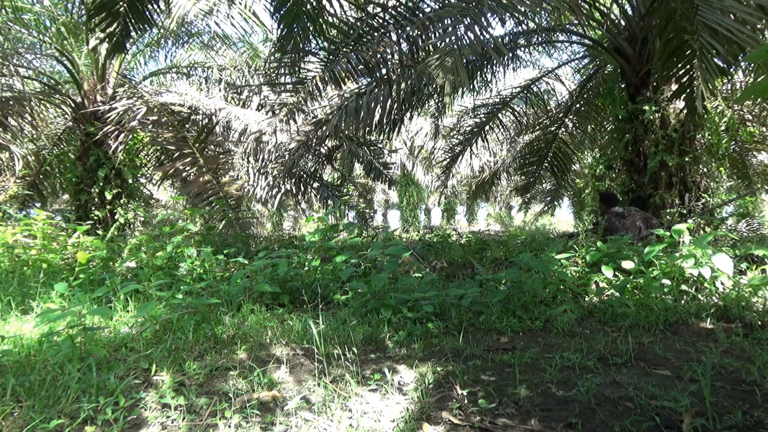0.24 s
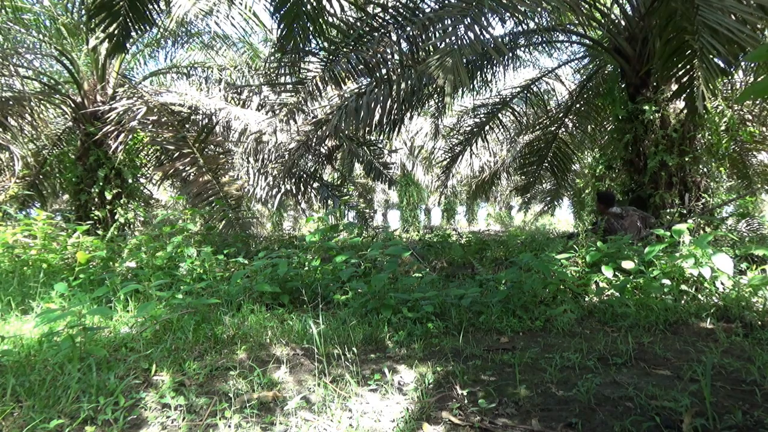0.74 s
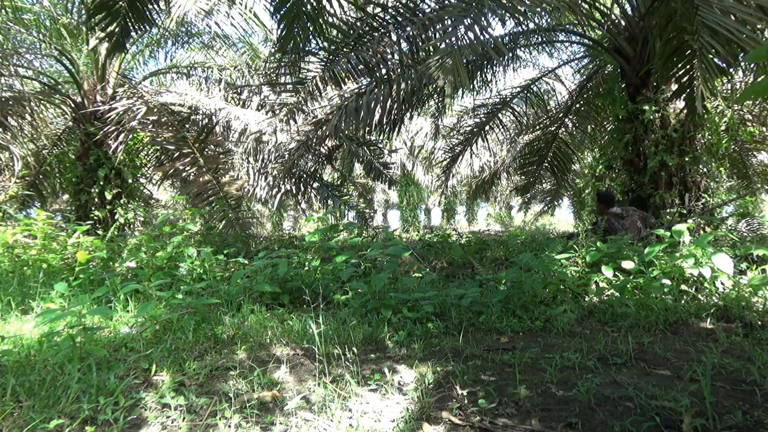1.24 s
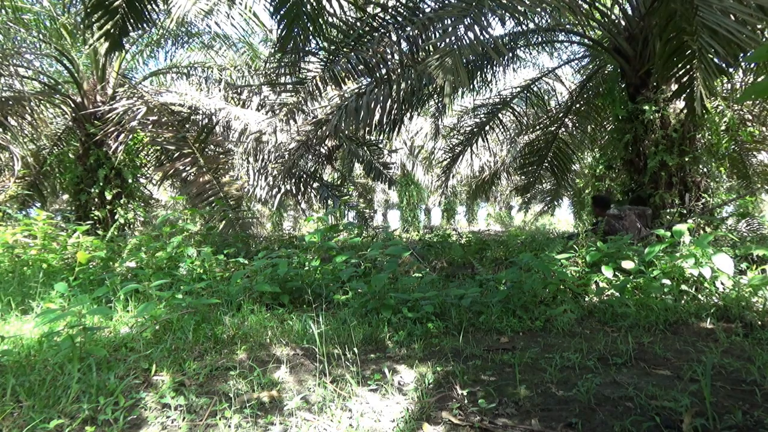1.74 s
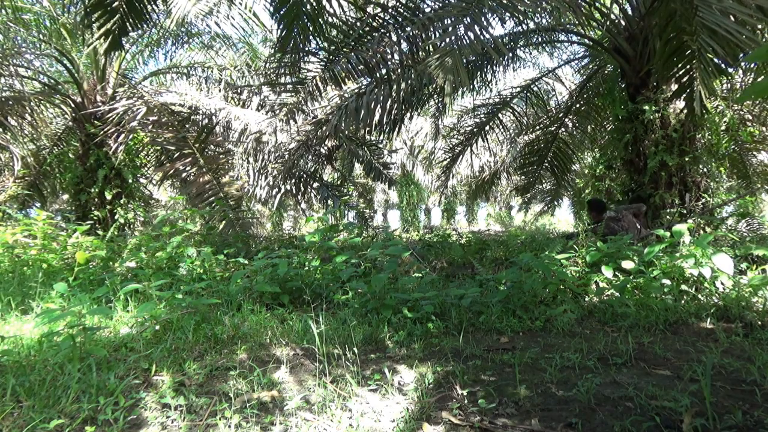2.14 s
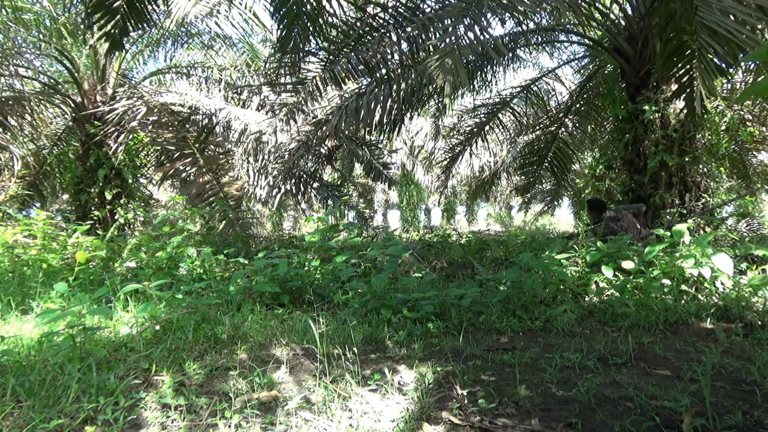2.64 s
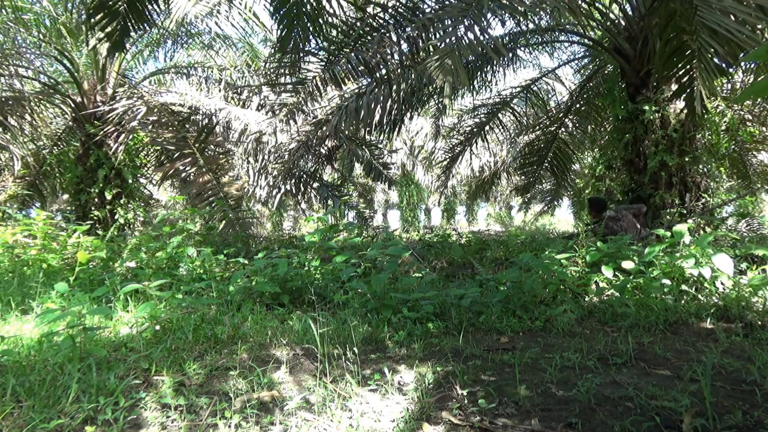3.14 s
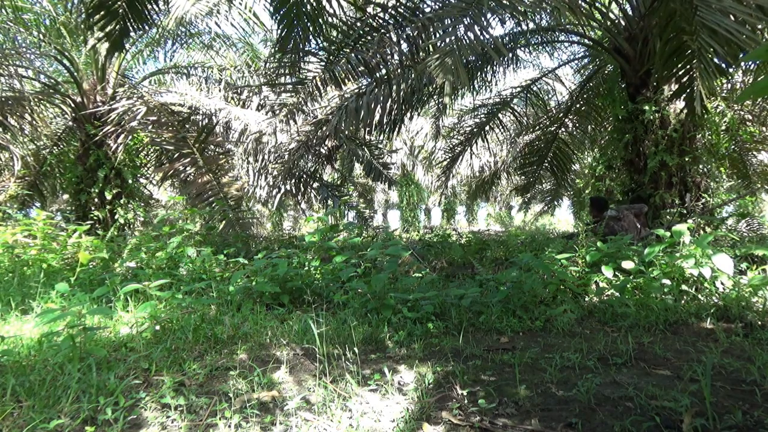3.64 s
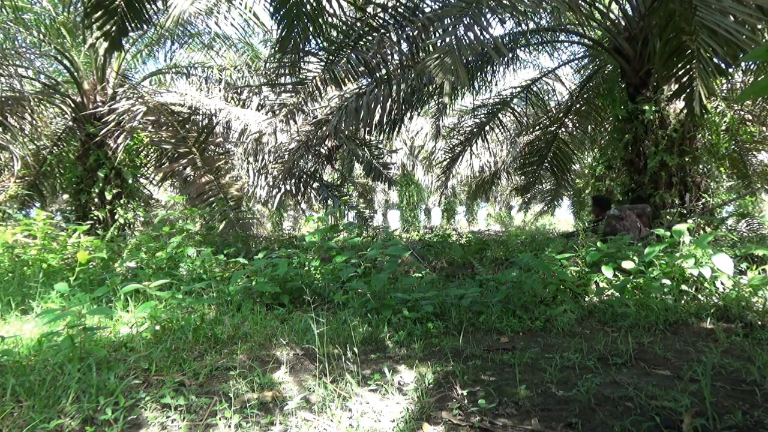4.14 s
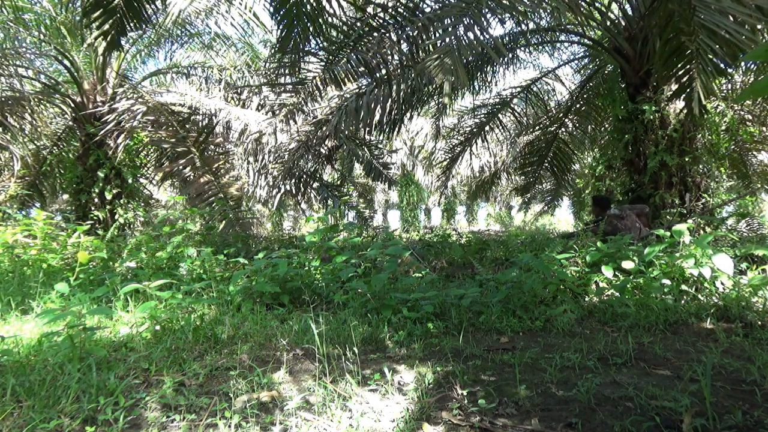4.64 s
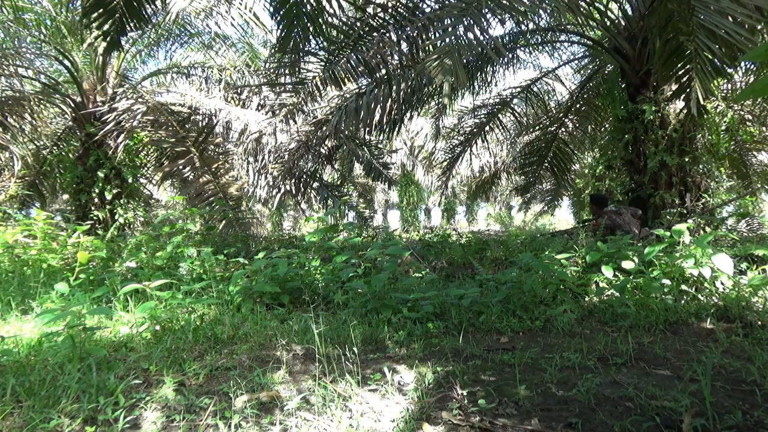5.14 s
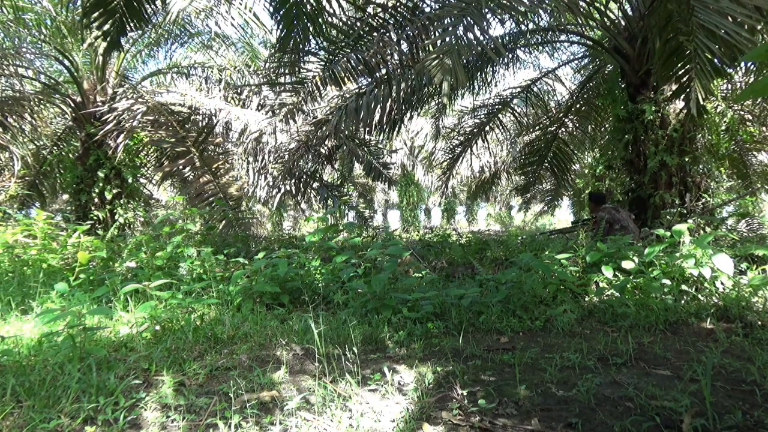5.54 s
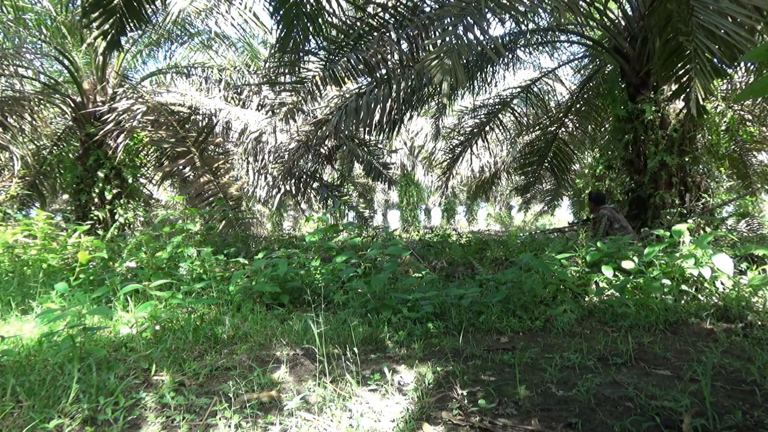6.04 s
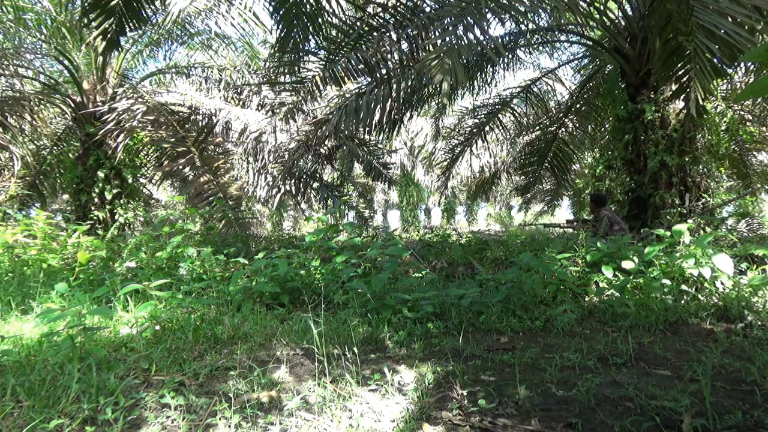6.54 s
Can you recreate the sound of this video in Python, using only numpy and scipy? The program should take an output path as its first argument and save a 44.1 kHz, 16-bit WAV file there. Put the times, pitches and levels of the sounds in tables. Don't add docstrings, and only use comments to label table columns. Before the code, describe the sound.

Dense, bright insect drone with quick throbbing pulses, two low rolled dove coos, a twig tick and faint distant bird notes.

```python
import sys
import numpy as np
from scipy import signal
from scipy.fft import rfft, irfft, next_fast_len
from scipy.io import wavfile
from scipy.ndimage import uniform_filter1d, map_coordinates

SR = 44100
rng = np.random.default_rng(int(sys.argv[2]) if len(sys.argv) > 2 else 0)


def int16_out(signal):
    q = np.round(np.clip(np.atleast_2d(signal).T, -1, 1) * 32767)
    wavfile.write(sys.argv[1], SR, q.astype(np.int16))


def linear_from_db(decibels):
    return 10 ** (np.asarray(decibels, float) / 20)


N = 298998
T = np.arange(N) / SR


def unit(x):
    return x / np.sqrt(np.mean(x ** 2) + 1e-20)


def along(points, hz):
    f, v = np.transpose(points)
    return np.interp(np.log(hz + 1), np.log(f + 1), v)


def colour(points):
    return lambda hz: linear_from_db(along(points, hz))


def wobble(rate):
    knots = rng.standard_normal(int(N * rate / SR) + 4)
    return map_coordinates(knots, [T * rate])


def filtered(x, response):
    m = next_fast_len(N + SR // 2)
    spectrum = rfft(x, m) * response(np.fft.rfftfreq(m, 1 / SR))
    return irfft(spectrum, m)[..., :N]


def resonant(modes):
    return lambda f: sum(linear_from_db(db) * (1j * f * w / (c * c - f * f + 1j * f * w)) ** 2 for c, w, db in modes)


def add(into, start, sound):
    i = round(start * SR)
    part = into[max(i, 0):i + len(sound)]
    part += sound[max(-i, 0):][:len(part)]


def beats(first, period, slowing):
    k = np.arange(-2, 60)
    return np.interp(T, first + period * k + slowing * k ** 2 / 2, k)


def buzz(turns, response, clear, smear, depth):
    clicks = np.diff(np.floor(turns), prepend=np.floor(turns[0])) * linear_from_db(rng.normal(0, 1.3, N))
    crisp = unit(filtered(clicks, response))
    gate = 1 + depth * np.exp(-(turns % 1) / smear)
    scattered = filtered(gate * rng.standard_normal((2, N)), response)
    scattered = scattered / np.std(scattered)
    clear = np.clip(clear, 0, 1)
    return np.sqrt(1 - clear) * scattered + np.sqrt(clear) * crisp * [[1], [0]]


def faint_tone(length, hz, db, chirps, sharp, blur, blur_rate):
    t = np.arange(round(length * SR)) / SR
    shake, fade = (map_coordinates(row, [t * blur_rate]) for row in rng.standard_normal((2, 99)))
    swell = np.abs(np.sin(np.pi * chirps * t / length)) ** sharp
    return linear_from_db(db + 0.89 * blur * fade) * swell * np.sin(2 * np.pi * hz * t + blur * shake)


# pitch_hz, level_db
BASS = [(13, -61), (22, -47), (41, -28), (75, -21), (97, -3), (123, -9.5), (151, -2.5), (171, -4),
        (260, -1.5), (288, 0), (330, -2.5), (430, -31), (730, -120)]
AIR = [(190, -35), (330, -2.5), (577, 0.5), (1120, 0.5), (1780, -2.5), (3120, -5.5), (3500, -1.5),
       (3810, -5.5), (4100, 0), (5330, -13), (9020, -120)]


def air():
    shade = lambda hz: linear_from_db(np.where(hz < 330, along(BASS, hz) + 0.6, along(AIR, hz)))
    hush = filtered(rng.standard_normal((2, N)), shade)
    gusts_db = .4 * wobble(2.7) + .2 * wobble(9)
    return linear_from_db(-57.5 + gusts_db) * hush / np.std(hush)


FLUTTER = [.008, .947, 1.945, 2.92, 3.866, 4.798, 5.788, 6.753]
# time_s, level_db
CHORUS = [(0, -39), (1.3, -39.5), (2.4, -39.5), (2.93, -40.5), (3.4, -40), (4.66, -39), (5.2, -39.5),
          (5.74, -39), (6.78, -38.5)]
# pitch_hz, level_db
LOWER = [(2320, -31.5), (3950, -27), (4410, -4), (5060, -1.5), (5540, -3.5), (6100, -15.5), (7930, -32),
         (13400, -120)]
UPPER = [(3560, -29.5), (6050, -39), (6150, -15), (6330, -6), (6660, 3), (7170, 4), (7380, 4.5), (7640, -3),
         (7880, -15.5), (7990, -19), (8150, -35), (10600, -67), (17900, -120)]
OVERTONES = [(4740, -17), (8050, -2), (8230, -0.5), (8600, -1), (9360, 0.5), (10200, -3), (11200, 1),
             (11700, -3.5), (12400, -11.5), (14300, -1), (14900, -3), (15500, -12)]
# first_throb_s, period_s, slowing_s per throb, level_db
LOW_SINGER = (.12, .1434, 0, -42.5)


def chorus():
    swell_db = np.interp(T, *np.transpose(CHORUS))
    swell_db = swell_db - swell_db.mean()
    next_flutter = 2 * FLUTTER[-1] - FLUTTER[-2]
    beat = 18 * np.interp(T, list(FLUTTER) + [next_flutter], np.arange(len(FLUTTER) + 1))
    flutter = np.cos(2 * np.pi * beat)
    strokes = beat * 5 + .02 * wobble(60)

    echo_db = .4 * np.cos(2 * np.pi * beats(*LOW_SINGER[:3])) + .4 * wobble(3)
    lower_db = -45 - 0.19 * swell_db + echo_db
    lower = linear_from_db(lower_db) * buzz(89 * T + .1 * wobble(15), colour(LOWER), 0.02, smear=0.3, depth=0.41)

    upper_db = -39.5 + swell_db + 0.45 * flutter + 0.44 * wobble(3.83) + 0.45 * wobble(25)
    upper = linear_from_db(upper_db) * buzz(strokes, colour(UPPER), 0.057, smear=0.24, depth=0.4)

    over_db = -53 + .2 * swell_db - 0.11 * T + 0.31 * wobble(3.66) + 0.3 * wobble(40)
    over = linear_from_db(over_db) * buzz(strokes, colour(OVERTONES), .01, smear=0.48, depth=0.19)
    over = over + (linear_from_db(1.1 * flutter) - 1) * filtered(over, lambda hz: hz > 12500)
    return lower + upper + over


def singer(song, drum, click_hz, clear, sharp, gain_db, uneven_db):
    *tempo, db = song
    beat = beats(*tempo)
    swell = (.5 + .5 * np.cos(2 * np.pi * beat)) ** sharp
    effort_db = uneven_db * np.interp(beat, np.arange(-2, 60), rng.standard_normal(62))
    turns = np.cumsum(click_hz * (1 + .004 * wobble(30))) / SR
    return linear_from_db(db + gain_db + effort_db) * swell * buzz(turns, resonant(drum), clear, smear=0.59, depth=0.78)


# first_throb_s, period_s, slowing_s per throb, level_db
MID_SINGER = (.1, .169, .00022, -44)
HIGH_SINGER = (.117, .127, .001, -48)
# pitch_hz, width_hz, level_db
LOW_DRUM = [(4600, 250, -24), (5093, 570, 22), (5470, 630, -13)]
MID_DRUM = [(5434, 280, 9), (5574, 340, 12)]
HIGH_DRUM = [(8740, 560, 0)]


def near_cicadas():
    low = singer(LOW_SINGER, LOW_DRUM, 90, clear=0.017, sharp=0.98, gain_db=-2.0, uneven_db=0.2)
    first_dip_s, cycle_s, fade_db_per_s = .76, .96, 0.35
    wane_db = np.cos(2 * np.pi * (T - first_dip_s) / cycle_s)
    low = low * linear_from_db(-wane_db - fade_db_per_s * (T - T[-1] / 2))
    mid = singer(MID_SINGER, MID_DRUM, 124, clear=0.14, sharp=1.0, gain_db=-3.0, uneven_db=2.2)
    high = singer(HIGH_SINGER, HIGH_DRUM, 141, clear=0.046, sharp=0.36, gain_db=-6.5, uneven_db=0.0)
    high_stops_s = 1.66
    return low + mid + high * (T < high_stops_s)


# middle_s, half_width_s, level_db
MEADOW = [
    (.43, .015, -52),
    (1.85, 0.14, -59),
    (2.53, 0.067, -60),
    (3.47, 0.17, -58),
    (3.82, .05, -57),
    (3.91, 0.04, -55),
    (4.89, 0.17, -59),
    (6.2, 0.28, -59),
]
# pitch_hz, width_hz, level_db
MEADOW_WING = [(3490, 330, 0), (3720, 330, -1)]


def far_crickets():
    pulses = buzz(37 * T + 0.52 * wobble(4.3), resonant(MEADOW_WING), 0, smear=0.38, depth=2.3)
    bouts = linear_from_db(-70) + sum(linear_from_db(db) * np.exp(-((T - s) / half) ** 2) for s, half, db in MEADOW)
    return linear_from_db(-8.0) * bouts * pulses


# start_s, end_s, pitch_hz, chirps_per_s, level_db
TRILLS = [
    (.17, .41, 3570, 40, -63),
    (1.7, 2.0, 3680, 17, -63),
    (2.323, 2.596, 3480, 22, -65),
    (3.365, 3.64, 3700, 18, -69),
    (3.773, 3.924, 3490, 22, -56),
    (3.85, 3.99, 3660, 20, -62),
    (4.735, 5.0, 3744, 18, -61),
    (5.72, 5.85, 3650, 20, -63),
    (6.08, 6.38, 3700, 18, -62),
]
TICKER = (-.011, .351, 2600, 24.9, -60)


def crickets():
    out = np.zeros(N)
    for start, end, hz, rate, db in TRILLS:
        add(out, start, faint_tone(end - start, hz, db + 1, (end - start) * rate, 1.8, 1.7, 140))
    start, end, hz, rate, db = TICKER
    add(out, start, faint_tone(end - start, hz, db, (end - start) * rate, 14, .8, 60))
    return out


# start_s, peak_db, pitch_hz, width_hz
TWIG = [
    (.431, -32, 3250, 1300),
    (.431, -52, 1950, 400),
    (1.433, -45, 1250, 500),
    (1.433, -47, 2400, 1200),
]


def twig():
    out, t = np.zeros(N), T[:800]
    for s, db, hz, width in TWIG:
        strike = np.e * np.pi * width * t * np.exp(-np.pi * width * t)
        ring = linear_from_db(db) * strike * np.sin(2 * np.pi * hz * t)
        add(out, s, ring)
        add(out, s + .0027, .45 * ring)
    return out


# middle_s, peak_db, top_hz, fall_s
COOS = [
    [(.946, -58.5, 584, .03), (1.2, -45, 659, .038), (1.72, -55, 626, .17)],
    [(3.946, -58.5, 576, .035), (4.205, -46.5, 650, .038), (4.725, -54.5, 620, .065)],
]
# rise_s, hold_s, sag_hz at .1 s after the peak
NOTE_SHAPES = [
    (.028, .015, 230),
    (.032, .028, 280),
    (.04, .15, 44),
]


def coo_shape():
    depth_db, level_round, sag_round = 25, 1.7, 1.5
    lead_in_s, lead_in_db = .052, -14
    rise_sag, lowest_hz = .5, 538
    roll_s, crest_s, under_hz, over_hz = 0.35, 0.089, 24.7, 14.3
    level, pitch = np.zeros(N), np.full(N, 600.)
    for call in COOS:
        s, db = call[1][:2]
        level = level + linear_from_db(db + lead_in_db) * np.exp(-((T - s + lead_in_s) / 0.015) ** 2)
        for (s, db, hz, fall), (rise, hold, sag_hz) in zip(call, NOTE_SHAPES):
            away = np.maximum(np.abs(T - s) - hold / 2, 0) / np.where(T < s, rise, fall)
            level = level + linear_from_db(db - depth_db * np.minimum(away, 3) ** level_round)
            sag = sag_hz * np.where(T < s, rise_sag, 1) * np.abs(10 * (T - s)) ** sag_round
            sounding = (T > s - .1) & (T < s + hold / 2 + 3 * fall)
            pitch = np.where(sounding, np.maximum(hz - sag, lowest_hz), pitch)
        s, _, hz, _ = call[2]
        climb = np.interp(T - s, [-roll_s, -crest_s, 0], [hz - under_hz, hz + over_hz, hz])
        pitch = np.where((T > s - roll_s - .03) & (T < s), climb, pitch)
    return level, pitch


# time_s, peak_db
ROLL = [(1.401, -53), (1.418, -47), (1.437, -41.5), (1.511, -51), (1.543, -45.5), (1.57, -49), (1.589, -45),
        (1.624, -43), (1.646, -51), (1.686, -54), (1.722, -50), (4.403, -51), (4.421, -48), (4.437, -48),
        (4.463, -50), (4.48, -51), (4.517, -47.5), (4.541, -41.5), (4.578, -39.5), (4.615, -47),
        (4.644, -51), (4.668, -46), (4.705, -61), (4.728, -54), (4.79, -56), (4.877, -54)]
# delay_s, level_db
TRUNKS = [
    (.061, -21),
    (.083, -22),
]


def dove():
    level, pitch = coo_shape()
    puffs, t = np.zeros(N), np.arange(-1000, 1000) / SR
    puff = np.exp(-.5 * (t / np.where(t < 0, 0.0027, 0.0051)) ** 2)
    for s, db in ROLL:
        add(puffs, s + t[0], linear_from_db(db - 2.5) * puff)

    hoarse = (T % 3 > 1.35) * 1.0
    phase = 2 * np.pi * np.cumsum(pitch * (1 + 0.0055 * wobble(40))) / SR
    phase = phase + .45 * hoarse * wobble(75)
    flutter = linear_from_db((.3 + 1.8 * hoarse) * wobble(85))
    tone = np.sin(phase) + linear_from_db(-49) * np.sin(2 * phase)
    voice = (np.sqrt(2) * level * flutter + puffs) * tone
    rolling = uniform_filter1d(puffs, 1800)
    breath = unit(filtered(rng.standard_normal(N), resonant([(725, 130, 0)])))
    voice = voice + linear_from_db(-15) * (puffs + 2.2 * rolling + 1.5 * hoarse * level) * breath

    back = lambda shift: sum(linear_from_db(db) * np.roll(voice, round((s + shift) * SR)) for s, db in TRUNKS)
    tail = rng.standard_normal((2, SR // 3)) * linear_from_db(-60 * T[:SR // 3] / 0.36)
    haze = signal.fftconvolve(voice[None], tail / np.linalg.norm(tail[0]), axes=1)[:, :N]
    return voice + np.array([back(0), back(.0002)]) + linear_from_db(-22) * haze


# start_s, length_s, pitch_hz, level_db
FAR_BIRD = [
    (3.36, .08, 2410, -64),
    (4.4, 0.091, 1658, -63),
    (4.765, 0.078, 1100, -59),
    (4.867, .08, 1065, -61),
    (5.103, 0.13, 1070, -61),
    (5.838, 0.15, 1108, -62),
    (5.893, 0.13, 1634, -61),
    (6.1, 0.21, 1103, -61.5),
]


def far_bird():
    out = np.zeros(N)
    for s, length, hz, db in FAR_BIRD:
        add(out, s, faint_tone(length, hz, db - 1.5, 1, .8, 1.9, 120))
    return out


# pitch_hz, width_hz, level_db
PATHS = [(5087, 25, 3), (5132, 30, 3), (5240, 22, 3), (5405, 25, 3), (5535, 22, 3), (5654, 25, 4),
         (6900, 30, 2.5), (7155, 30, 2.5), (7345, 18, 3), (7489, 25, 4), (8715, 48, 2.5), (11127, 54, 2.5),
         (14361, 38, 3), (14685, 22, 3)]


def foliage(pair, ripple_db):
    knots = rng.standard_normal(SR // 2 // 30 + 2)
    ripple = lambda hz: ripple_db * map_coordinates(knots, [hz / 30]) * (hz > 1500)
    peaks = lambda hz: sum(db * np.exp(-(2 * (hz - c) / w) ** 2) for c, w, db in PATHS)
    return filtered(pair, lambda hz: linear_from_db(ripple(hz) + peaks(hz)))


# pitch_hz, correlation
ALIKE = [(30, .9999), (92, 1), (140, 1), (210, 0.94), (330, 0.72), (500, 0.23), (1100, 0.022),
         (1800, 0.049), (2700, 0.35), (4200, 0.66), (5700, 0.94), (6700, 0.36), (7500, 0.68), (8700, 0.85),
         (11000, 0.93), (12500, .9999)]
# pitch_hz, phase_rad
LEAD = [(6000, -0.13), (6800, -0.073), (7400, 0.038), (8200, -.1), (11000, 0)]


def ports(pair):
    turn = lambda hz: np.arccos(np.clip(along(ALIKE, hz), -1, 1)) / 2
    mid, side = filtered(pair, lambda hz: np.array([np.cos(turn(hz)), np.sin(turn(hz))]))
    lead = lambda hz: np.exp(.5j * np.outer([1, -1], along(LEAD, hz)))
    return filtered(np.array([mid + side, mid - side]), lead)


def scene():
    diffuse = air() + chorus() + near_cicadas() + far_crickets()
    grove = ports(foliage(diffuse, ripple_db=1.1))
    small_voices = crickets() + twig() + far_bird()
    return grove + dove() + small_voices * linear_from_db([[.7], [-.7]])


def band_limit(x):
    return signal.sosfilt(signal.butter(12, 15650, fs=SR, output="sos"), x)


def record(dry):
    low_cut_hz = 60
    mix = filtered(dry, lambda hz: 1 / np.sqrt(1 + (low_cut_hz / (hz + 1)) ** 6))
    return band_limit(mix)


dry = scene()
out = record(dry)
int16_out(out)
```